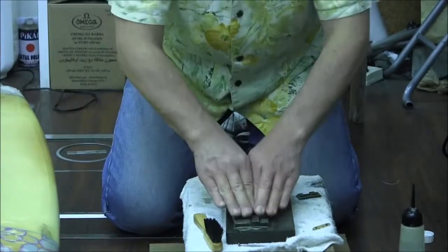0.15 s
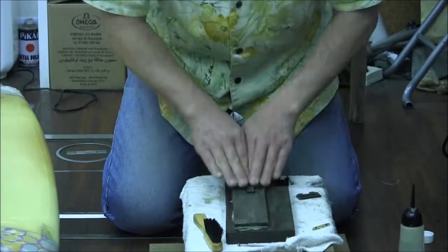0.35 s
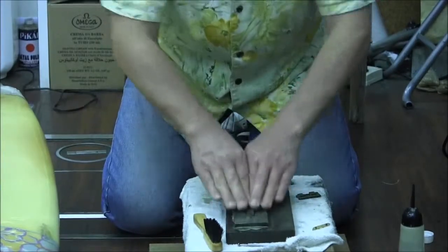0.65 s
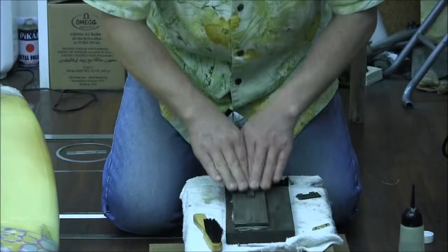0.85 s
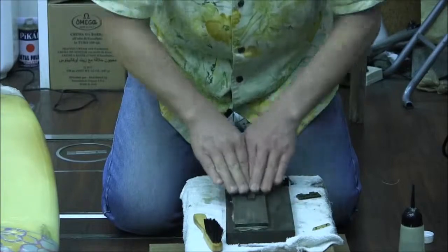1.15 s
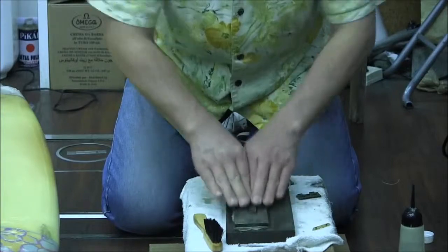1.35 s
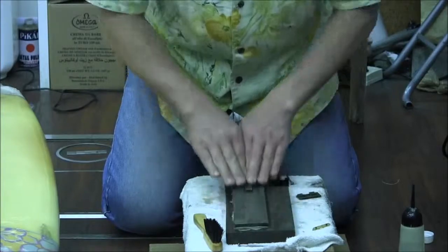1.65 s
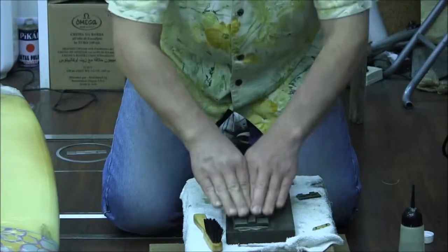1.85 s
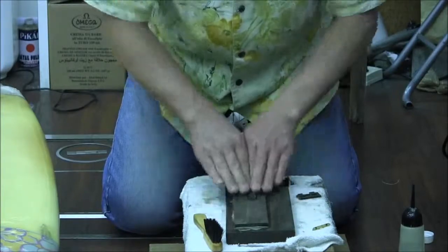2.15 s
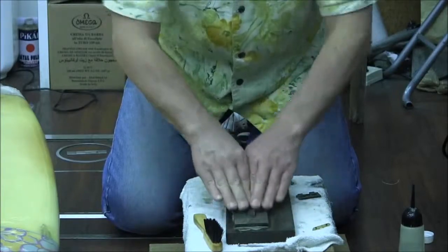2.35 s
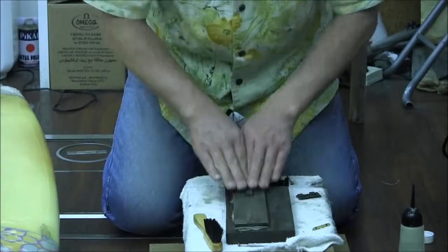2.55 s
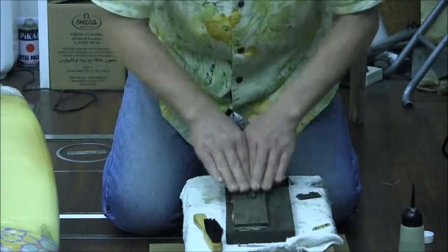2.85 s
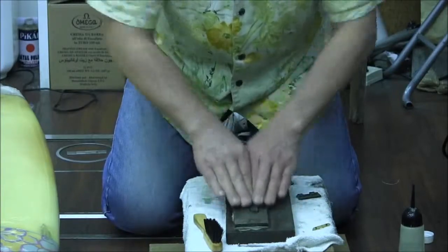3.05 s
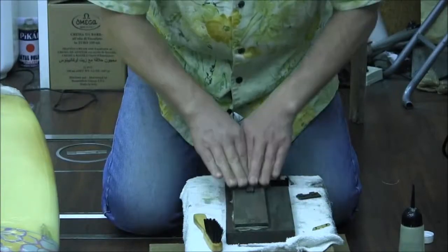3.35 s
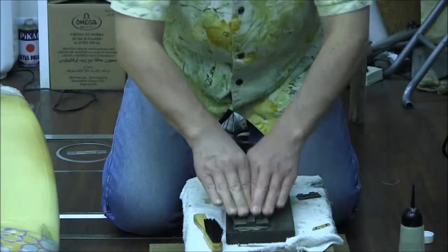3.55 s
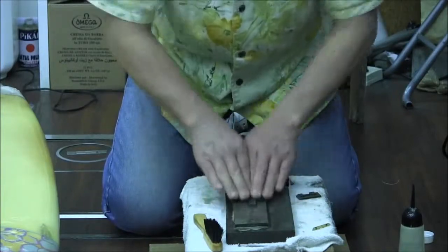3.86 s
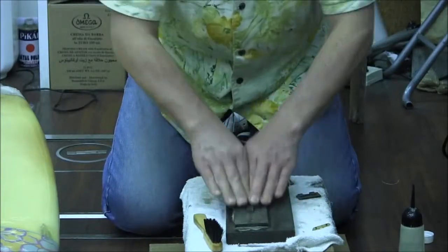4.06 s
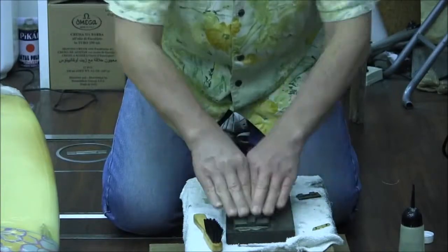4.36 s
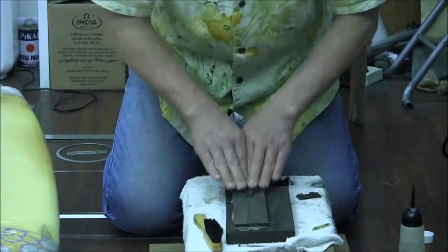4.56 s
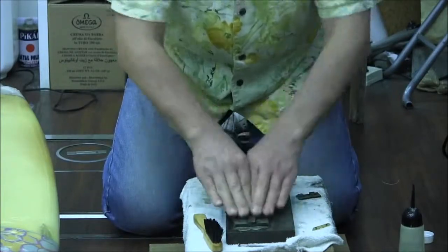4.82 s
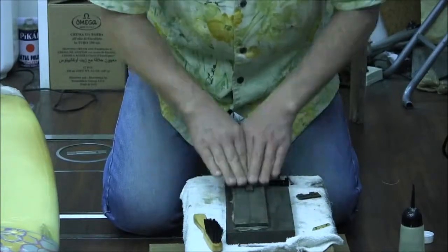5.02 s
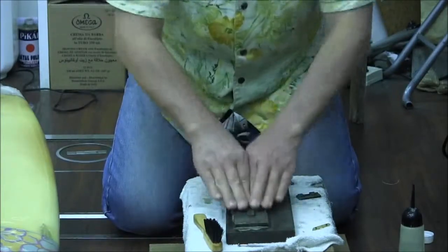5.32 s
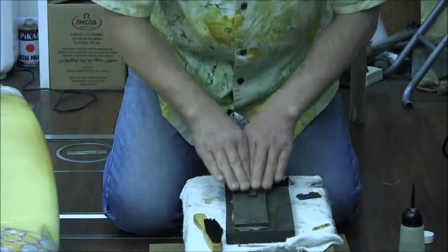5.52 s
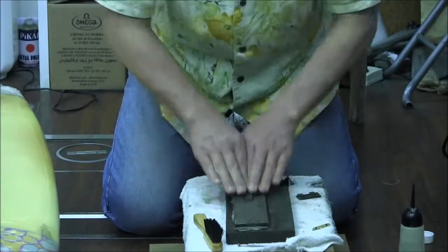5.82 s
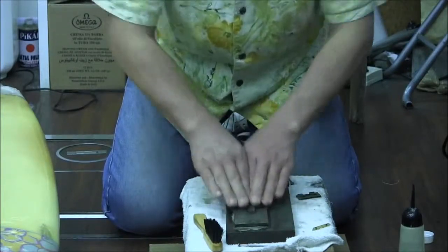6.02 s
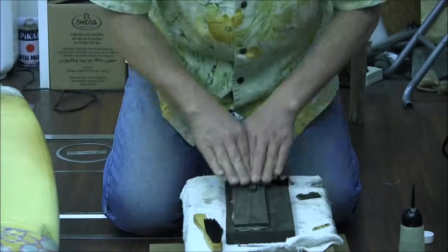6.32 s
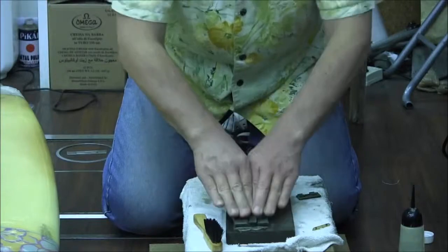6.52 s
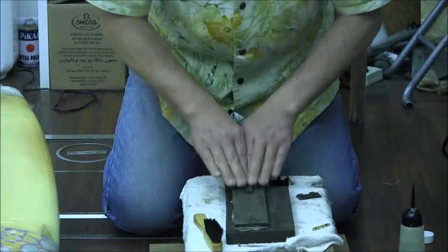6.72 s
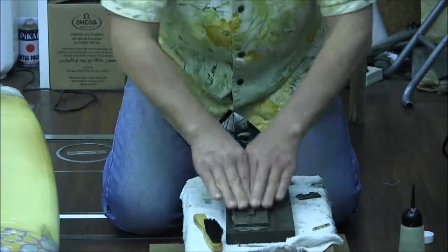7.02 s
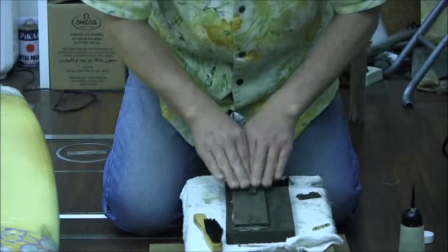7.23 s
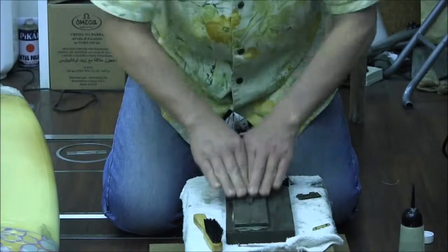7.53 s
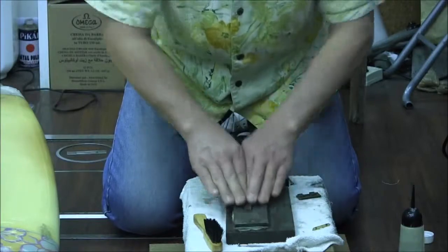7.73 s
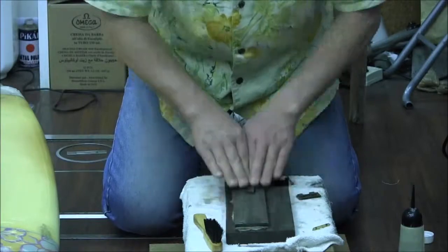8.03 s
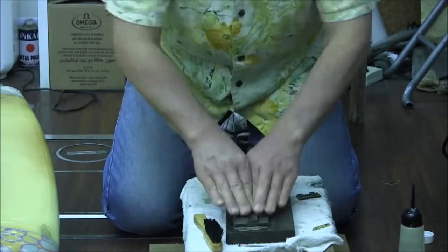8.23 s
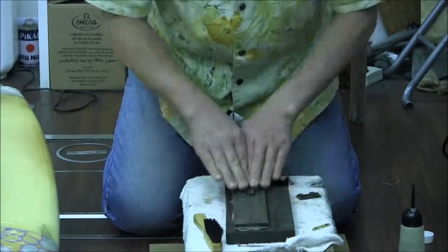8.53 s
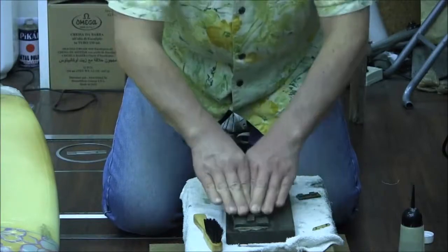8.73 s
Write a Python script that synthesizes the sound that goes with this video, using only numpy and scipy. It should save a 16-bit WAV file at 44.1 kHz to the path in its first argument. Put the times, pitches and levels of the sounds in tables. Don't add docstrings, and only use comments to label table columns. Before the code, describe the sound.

A steel blade is rubbed steadily back and forth on a wet whetstone, a gritty ringing hiss, with wooden knocks behind and a low room hum.

```python
import sys
import numpy as np
from scipy import signal
from scipy.io import wavfile
from scipy.ndimage import uniform_filter1d

SR = 44100
rng = np.random.default_rng(int(sys.argv[2]) if len(sys.argv) > 2 else 0)


def wav_record(signal):
    frames = np.transpose(np.atleast_2d(signal))
    bounded = np.clip(frames, -1, 1)
    quanta = np.round(bounded * 32767).astype(np.int16)
    wavfile.write(sys.argv[1], SR, quanta)


def natural_amplitude(level_db):
    exponent = np.asarray(level_db, float) / 20
    return 10 ** exponent


N = 391608


def evened(x):
    return x / np.sqrt(np.mean(x ** 2) + 1e-20)


def read(points, hz):
    f, value = np.transpose(points)
    return np.interp(np.log(hz + 1), np.log(f + 1), value)


def along(rows, t):
    s, *columns = np.transpose(rows)
    return [np.interp(t, s, column) for column in columns]


def add(mix, start_s, sound):
    part = mix[round(start_s * SR):][:len(sound)]
    part += sound[:len(part)]


def peak(hz, centre_hz, width_hz):
    return 1 / (1 + (2 * (hz - centre_hz) / width_hz) ** 2)


def resonate(x, hz, width_hz):
    turn = np.exp(2j * np.pi * np.cumsum(hz * np.ones(len(x))) / SR)
    r = np.exp(-np.pi * width_hz / SR)
    smooth = signal.lfilter([1 - r], [1, -r], x / turn + 1e-18)
    return 2 * (turn * smooth).real


def clicks(per_s, spread_db):
    size = natural_amplitude(spread_db * np.minimum(rng.exponential(1, N), 4))
    happens = rng.random(N) < per_s / SR
    return evened(size * rng.standard_normal(N) * happens)


def patches(shape, count, size):
    field = rng.standard_normal(shape[::-1]).T
    field = uniform_filter1d(field, size=count, axis=0)
    return evened(uniform_filter1d(field, size=size, axis=1))


def colour(x, points, patchy_db, size=512):
    frame = dict(fs=SR, nperseg=size, noverlap=size * 3 // 4)
    hz, t, z = signal.stft(x, **frame)
    z = z * natural_amplitude(read(points, hz)[:, None] + patchy_db * patches(z.shape, count=6, size=14))
    return signal.istft(z, **frame)[1][:len(x)]


def ports(x, likeness):
    hz, t, z = signal.stft(x, SR, nperseg=1024)
    same = np.clip(read(likeness, hz), 0, 1)[:, None]
    scramble = np.exp(2j * np.pi * rng.random(z.shape[::-1]).T)
    side = z * scramble * np.sqrt((1 - same) / (1 + same))
    return signal.istft(np.array([z + side, z - side]), SR, nperseg=1024)[1][:, :N]


# pitch_hz, level_db
GRIT_COLOUR = [(300, -19), (700, -12), (1010, -12.5), (1480, -11), (2000, -15.5), (2800, -8.5), (3540, -9),
               (4500, -6.5), (5200, -5), (6190, -8), (7200, -9), (9200, -9.5), (10500, -12.5),
               (13500, -20.5)]
# pitch_hz, rise_db (per dB of effort)
BRIGHTER_WITH_EFFORT = [(500, -0.6), (1500, -0.5), (4000, 1), (6000, 0.62), (8000, 1.46), (12000, 2)]
# pitch_hz, width_hz, level_db
BLADE_MODES = [(3830, 400, -7), (4025, 90, -1), (4125, 100, 2.5), (4200, 480, -1), (4290, 90, 1),
               (4480, 500, -7)]
# pitch_hz, width_hz, level_db (over the grit)
STONE_MODES = [(1020, 36, 3.5), (1650, 22, 6.5), (1865, 33, 7), (2050, 41, 7), (2320, 12, 7), (2462, 28, 3),
               (2567, 43, 5.5), (2780, 31, -0.5), (3250, 500, -1.5), (4740, 40, -0.5), (7970, 830, 4),
               (8060, 350, 2.5)]
# time_s, extra_db
FREE_MOMENTS = [(1.55, 0), (2.81, 2), (3.24, 5), (4.08, 3), (4.29, 3.5), (4.62, 1), (5.1, 5), (5.23, 3),
                (6.56, 3.5), (6.85, 3), (7.06, 3), (7.8, 3)]
# time_s, length_s, level_db, pitch_hz, glide_hz_per_s
BITES = [(0.457, 0.045, -35.5, 2590, 10), (0.545, 0.062, -35, 3270, 1500), (1.12, .05, -34.5, 3170, 10),
         (2.825, .07, -37, 3300, 13), (3.424, .08, -40, 2560, 2000), (5.242, 0.065, -40, 3030, 10),
         (5.8, 0.095, -38.5, 3100, 10), (6.035, 0.11, -38.5, 2450, -5500), (6.206, 0.13, -39, 3250, 10),
         (6.44, 0.073, -38.5, 2520, -6000), (6.873, 0.04, -35, 3050, 10), (7.75, 0.065, -46, 2290, -3000),
         (8.265, 0.063, -37, 3280, 10), (8.382, 0.072, -35.5, 3200, 8), (8.362, .06, -35, 3950, 10),
         (8.637, .06, -40, 2870, -1500), (8.816, 0.081, -32, 3340, 900)]
# time_s, length_s, level_db, pitch_hz
TURN_SINGS = [(1.05, 0.16, -33, 1010), (1.82, .07, -36, 2030), (4.333, .08, -25, 2050),
              (4.76, .08, -24.5, 2060), (5.178, .07, -26, 2080), (6.083, 0.06, -21, 2060),
              (6.48, .08, -25, 2060), (6.917, .07, -28, 2000), (7.342, 0.076, -25, 2060),
              (7.6, .05, -29, 2310), (7.777, .08, -27, 2030), (7.758, .05, -29, 1800),
              (8.14, .06, -24, 2320), (8.19, .05, -25, 2100), (8.22, .06, -29, 2500)]


def scrape():
    frame = dict(fs=SR, nperseg=1024, noverlap=768)
    hz, t, grit = signal.stft(clicks(per_s=30000, spread_db=-0.07), **frame)
    hz = hz[:, None]
    hand_db, ring_db, hollow_db, hollow_hz = strokes(t)

    effort_db = 10 * np.log10(natural_amplitude(2 * hand_db) + natural_amplitude(2 * -46.)) + 41.06
    hiss = natural_amplitude(2 * (read(GRIT_COLOUR, hz) - 31. + read(BRIGHTER_WITH_EFFORT, hz) * effort_db))
    stone = 1 + sum(natural_amplitude(2 * db) * peak(hz, f, width) for f, width, db in STONE_MODES)

    ring_db = ring_db + sum(db * np.exp(-((t - s) / 0.032) ** 2) for s, db in FREE_MOMENTS)
    blade = sum(natural_amplitude(2 * db) * peak(hz, f, width) ** 2 for f, width, db in BLADE_MODES)
    ring = natural_amplitude(2 * (ring_db + 7.0)) * blade
    for s, length, db, f in TURN_SINGS:
        swell = np.exp(-(2 * (t - s) / length) ** 2)
        ring += natural_amplitude(2 * db) * swell * peak(hz, f, 100.0) ** 2

    hollow = natural_amplitude(2 * (hollow_db + 5.0)) * peak(hz, hollow_hz, 1720.0) ** 2
    hollow *= natural_amplitude(2 * 0.19 * patches(grit.shape, count=7, size=6))
    for s, length, db, f, glide in BITES:
        swell = np.exp(-(1.73 * (t - s) / length) ** 2)
        hollow += natural_amplitude(2 * (db + 6.5)) * swell * peak(hz, f + glide * (t - s), 750.0) ** 2

    fine_db = 3.03 * patches(grit.shape, count=1, size=20) + 0.58 * patches(grit.shape, count=12, size=8)
    power = (hiss + hollow) * stone * natural_amplitude(2 * fine_db)
    power = power + ring * natural_amplitude(2 * 0.42 * fine_db)
    out = signal.istft(grit * np.sqrt(power), **frame)[1][:N]
    out += squeaks()
    uneven_pressure = evened(uniform_filter1d(rng.standard_normal(N), size=900))
    return out * natural_amplitude(0.19 * uneven_pressure)


# start_s, effort_db, ring_db, hollow_db, hollow_pitch_hz
PUSH_STROKES = [(0.085, -40, -37.5, -37.5, 2750), (0.505, -40, -36, -37.5, 2530),
                (0.93, -40.5, -37.5, -37.5, 2440), (1.363, -39, -36, -38, 2700),
                (1.793, -39.5, -36.5, -36, 2750), (2.224, -39.5, -36.5, -39.5, 2510),
                (2.645, -40, -37.5, -37, 2750), (3.058, -41.5, -38.5, -39.5, 2680),
                (3.476, -39.5, -37.5, -39, 2520), (3.899, -39.5, -37.5, -38.5, 2650),
                (4.323, -40.4, -37, -40.5, 2530), (4.757, -39.5, -38.5, -40.5, 2670),
                (5.176, -39.5, -36.5, -40.5, 2777), (5.611, -40, -36, -37, 3260),
                (6.03, -39.5, -34.5, -39, 2910), (6.456, -39.5, -37, -39, 2714),
                (6.89, -40, -36.5, -40.5, 2650), (7.315, -39.5, -36.5, -40, 2800),
                (7.757, -39, -36.5, -39, 2706), (8.191, -39.5, -36.5, -38.5, 3000),
                (8.627, -39.5, -38, -38, 3100)]
# start_s, effort_db, ring_db, hollow_db, hollow_pitch_hz
PULL_STROKES = [(-0.13, -40, -40.5, -36.5, 2770), (0.315, -40.5, -37, -40, 2600),
                (0.73, -39.5, -38, -37, 2710), (1.15, -40.1, -38, -36.5, 2570),
                (1.582, -40, -38, -39.5, 2450), (2.012, -39.5, -38.5, -38, 2830),
                (2.445, -40, -38.5, -37, 2700), (2.87, -39.5, -38, -40, 2520), (3.271, -40, -38, -38, 2540),
                (3.691, -40.5, -37.5, -39.5, 2704), (4.118, -40.0, -37.5, -38.5, 2700),
                (4.548, -38.5, -37.5, -40, 2640), (4.981, -40, -37.5, -39.5, 2660),
                (5.403, -40, -36.5, -39.5, 2780), (5.837, -40.5, -38, -39, 2800),
                (6.248, -40.0, -38.5, -41.5, 2750), (6.685, -40, -38, -41, 2714),
                (7.123, -40.5, -37.5, -39.5, 2770), (7.545, -39, -37.5, -40.5, 2714),
                (7.977, -40, -37.5, -39.5, 2770), (8.422, -39.5, -38, -37, 3100),
                (8.846, -39.5, -40.2, -37, 2800)]
# share_of_stroke (0-1), effort_db, ring_db, hollow_db, hollow_pitch_factor (times)
PUSH_SHAPE = [(0, -5.5, -2, -5, 0.99), (.13, -1, 1.5, -2, 0.88), (.35, -0.3, 0.8, -3.5, 0.96),
              (.55, 0.9, -0.6, -5.5, 1.24), (.77, 1.5, 2.5, -0.5, 1.11), (.89, -1.5, 3.5, -4, 0.85),
              (1, -3.5, -2, -3, 0.97)]
# share_of_stroke (0-1), effort_db, ring_db, hollow_db, hollow_pitch_factor (times)
PULL_SHAPE = [(0, -4, 2.5, -6, 0.71), (.18, -1.2, 0.5, -1.5, 0.97), (.38, -0.7, -1, -4, 0.96),
              (.52, -1, -0.5, -7, 1), (.72, 0, 2, -2.7, 1), (.88, -1.2, 2.5, -2, 1),
              (1, -5, -3, -0.5, 0.97)]


def strokes(t):
    last_turn_s, blend_s = 9.06, 0.03
    rows = [(row, PUSH_SHAPE) for row in PUSH_STROKES] + [(row, PULL_SHAPE) for row in PULL_STROKES]
    rows.sort(key=lambda pair: pair[0][0])
    ends = [row[0] for row, shape in rows[1:]] + [last_turn_s]
    own, shared = np.zeros((2, 4, len(t)))
    for ((start, *values), shape), end in zip(rows, ends):
        now = (t >= start) & (t < end)
        own[:, now] = np.array(values)[:, None]
        shared[:, now] = along(shape, (t[now] - start) / (end - start))
    own = uniform_filter1d(own, size=max(round(blend_s / (t[1] - t[0])), 1), axis=1)
    return *(own[:3] + shared[:3]), own[3] * shared[3]


# time_s, peak_db, pitch_hz, length_s
SQUEAKS = [
    (0.063, -21, 2720, 0.028),
    (1.34, -23, 3250, 0.023),
    (1.461, -16, 1930, 0.012),
    (4.738, -22, 3240, 0.011),
    (2.207, -22, 2130, 0.005),
    (3.23, -17, 4320, 0.0033),
    (3.522, -24, 4300, 0.0063),
    (8.444, -19, 4860, 0.012),
]


def squeaks():
    out = np.zeros(N)
    for s, db, f, length in SQUEAKS:
        u = np.arange(-2, 2, 1 / (length * SR + 8))
        rub = evened(resonate(rng.standard_normal(6000), f, 160.0))[-len(u):]
        add(out, s - 2 * length, natural_amplitude(db - 17.5) * rub * np.exp(-2 * u[:len(rub)] ** 2))
    return out


# time_s, peak_db, pitch_hz, crack_db (over the thud), box_ring_db
KNOCKS = [(0.4239, -24.5, 1560, -14, -30), (1.269, -45, 1020, -5, -14), (1.338, -36, 816, -12, -19),
          (1.45, -38, 1520, -10, -12), (2.073, -42, 1150, -4, -10), (2.204, -32, 581, 1, -16),
          (2.402, -24.5, 1560, 4, -19), (2.407, -31.5, 1700, 16, -8), (2.408, -40, 1150, 1, -6),
          (2.444, -34, 1700, 3, -20), (2.5235, -21, 1240, -14, -18), (2.528, -27.5, 1400, -10, -22),
          (2.6492, -21, 1600, -22, -11), (2.654, -25, 1500, -16, -8), (2.938, -35, 1145, 2, -23),
          (3.2912, -26, 1790, -25, -22), (3.296, -33, 1400, -14, -18), (3.456, -32, 704, -8, -24),
          (3.731, -39, 988, -2.5, -14), (3.929, -37, 1610, -1.5, -16), (3.947, -32, 1530, -5, -30),
          (4.055, -32, 684, -5, -27), (4.733, -39, 860, -13, -26), (4.914, -42, 912, -6, -22)]
# pitch_hz, level_db, fade_s (to -60 dB)
BOX_MODES = [(432, -14, 0.07), (679, -3, 0.11), (1150, -5, 0.21), (1290, -10, 0.23), (1730, -18, 0.089),
             (1630, -22, 0.24), (1930, -12, 0.22), (1450, -10, .15), (870, -20, 0.053), (2710, -8, .08)]


def knocks():
    t, out = np.arange(8000) / SR, np.zeros(N)
    for s, db, hz, crack_db, ring_db in KNOCKS:
        fade_s = 0.037 + 0.13 * max(db + 21, 0)
        noise, chance = rng.standard_normal(len(t)), rng.random((len(BOX_MODES), 2))
        crack = resonate(noise, 5600.0, 3800.0) * natural_amplitude(crack_db - 0.5 - 60 * t / max(0.29 * fade_s, .004))
        push = natural_amplitude(4.) * np.sin(2 * np.pi * 1700 * t) * np.exp(-t / .00022)
        thud = evened(resonate(noise, hz, 1150.0)) * natural_amplitude(-12.5 - 60 * t / max(1.1 * fade_s, .005))
        narrow = evened(resonate(resonate(noise, hz, 900.), hz, 900.))
        thud += narrow * natural_amplitude(-18 - 60 * t / (1.5 * fade_s))
        box = np.zeros(len(t))
        for (f, mode_db, mode_fade_s), (p, q) in zip(BOX_MODES, chance):
            level = natural_amplitude(mode_db + ring_db - 2.9 * p - 60 * t / mode_fade_s) * peak(f, hz, 1150.0)
            box += level * np.sin(2 * np.pi * f * (0.85 + 0.021 * q) * t)
        add(out, s + 0.00128, natural_amplitude(db) * (crack + push + thud + box))
    return out


# time_s, pitch_hz, peak_db, fade_s (to -60 dB)
KNOCK_RINGS = [(2.407, 1166, -33, 0.13), (2.403, 1656, -34, .12), (2.443, 1650, -38, .1),
               (2.444, 1150, -39, .1), (2.523, 1200, -37, .07), (2.523, 1490, -32, .06),
               (2.524, 862, -30.5, 0.067), (2.53, 1344, -40, 0.2), (2.526, 1625, -43, .2),
               (2.53, 418, -43, 0.12), (2.526, 702, -44, .2), (2.526, 582, -41, 0.2),
               (2.651, 1467, -31, 0.056), (2.66, 1325, -36, 0.22), (2.653, 1185, -36, 0.13),
               (2.653, 1690, -46, 0.14), (2.653, 1970, -41, 0.45), (2.653, 2036, -41, 0.56),
               (2.69, 1100, -43.5, 0.45), (3.292, 1460, -38, .07), (3.292, 2400, -41, .06),
               (3.457, 565, -42, .07)]


def knock_rings():
    t, out = np.arange(8000) / SR, np.zeros(N)
    for s, hz, db, fade_s in KNOCK_RINGS:
        edges = np.minimum(t / .002, 1) * np.minimum(40 * (t[-1] - t), 1)
        add(out, s, natural_amplitude(db - 60 * t / fade_s) * edges * np.sin(2 * np.pi * hz * t))
    return out


# time_s, peak_db, pitch_hz, length_ms
TICKS = [(0.4254, -33, 3900, .4), (0.4258, -22.5, 1700, 0.34), (1.3465, -26, 2300, .4),
         (2.073, -26, 4000, .3), (2.0814, -27, 2400, .4), (2.1317, -28, 10000, .15),
         (2.1547, -33, 1100, 0.5), (2.1546, -28, 7800, .2), (2.1805, -30, 10000, .15),
         (2.189, -26, 4500, .2), (2.1934, -22, 4500, .2), (2.1937, -25, 10500, .15),
         (2.2048, -19, 5500, .15), (2.2095, -20, 10000, 0.11), (2.2098, -26, 4000, 0.18),
         (2.402, -20, 6000, 0.26), (2.4034, -30, 2000, 0.35), (2.4052, -23, 4500, .3),
         (2.4078, -17, 5500, 0.12), (2.4074, -20.5, 10500, 0.18), (2.4095, -25, 5500, .2),
         (2.4095, -25, 9500, .15), (2.4104, -28, 1500, 0.56), (2.4415, -26, 2500, .3),
         (2.446, -25, 2000, 0.28), (2.4454, -29, 11000, .15), (2.5254, -24, 1700, .35),
         (2.5295, -24, 1800, .35), (2.6528, -24, 1900, 0.36), (2.6562, -25, 1500, 0.64),
         (2.6556, -29, 3800, .3), (2.9404, -37, 1500, .4), (3.293, -21.5, 1790, .3),
         (3.2971, -23, 1500, .4), (3.2987, -32, 2400, 0.36), (3.3032, -29, 4400, .6),
         (3.317, -32, 1800, .3), (3.392, -30, 1500, .3), (3.406, -28, 2300, .3), (3.4305, -29, 2000, 0.43),
         (3.458, -28, 1500, .3), (3.9305, -37, 800, 0.42), (3.9497, -28, 1610, 0.48),
         (4.733, -29, 1500, 0.27)]


def ticks():
    t, out = np.arange(-200, 400) / SR, np.zeros(N)
    for s, db, hz, length_ms in TICKS:
        bell = np.exp(-(1000 * t / (length_ms * np.where(t < 0, 1, 1.6))) ** 2)
        add(out, s + t[0], natural_amplitude(db) * bell * np.cos(2 * np.pi * hz * t))
    return out


# start_s, rise_s, hold_s, fall_s, level_db
SHUFFLES = [
    (.44, 0.033, .22, .06, -60),
    (0.657, 0.061, .01, 0.19, -54.5),
    (1.22, .02, 0.022, 0.059, -54.5),
    (1.329, 0.01, .004, 0.015, -48),
    (1.367, 0.076, 0.032, 0.11, -47.5),
    (1.95, 0.048, 0.17, .04, -53.5),
    (2.072, 0.092, 0.062, 0.068, -50.5),
    (2.407, 0.0024, 0.0031, 0.012, -41.5),
    (2.424, 0.013, .09, 0.01, -58),
    (3.285, 0.0037, 0.13, 0.037, -49),
]
# pitch_hz, level_db
WOOD_COLOUR = [(88, -48), (150, -14.5), (596, -2.5), (860, -0.5), (981, -5), (1140, 0.5), (1240, -1.5),
               (2580, -2.5), (5000, -13), (6500, -26), (11000, -120)]


def shuffles():
    rub = evened(colour(clicks(per_s=5000, spread_db=1.6), WOOD_COLOUR, patchy_db=1.2))
    ramp_db, sag_db_per_s = 21, 5
    level = np.zeros(N)
    for start, rise, hold, fall, db in SHUFFLES:
        t = np.arange(0, rise + hold + 2 * fall, 1 / SR)
        short = np.maximum(1 - t / rise, 0) + np.maximum((t - rise - hold) / fall, 0)
        add(level, start, natural_amplitude(db + 6.5 - ramp_db * short - sag_db_per_s * t))
    return level * rub + slips(rub)


# time_s, fade_s (to -60 dB), level_db, pitch_hz
SLIPS = [(2.4, .05, -46, 1600), (2.122, 0.11, -48, 2500), (2.145, 0.06, -37.5, 610), (2.7, .06, -46, 450),
         (2.437, 0.045, -30.5, 1260), (2.1, 0.045, -36, 1100), (2.528, .05, -37, 2300),
         (2.2, 0.044, -29, 2700), (2.1, .05, -44, 2900), (1.338, 0.047, -41, 690), (1.4, 0.046, -41, 1700),
         (1.2, .03, -39, 2100), (1.6, 0.082, -44, 2800), (2.13, 0.11, -47, 400), (1.9, 0.12, -54, 250),
         (3.295, .15, -48, 260), (2.204, 0.05, -49, 660), (3.314, 0.054, -45, 1300),
         (3.7, 0.043, -46, 1200), (3.341, .06, -43, 1400), (3.374, .06, -41, 1170), (3.1, .06, -43, 1300),
         (3.403, .04, -44, 2000), (2.9, 0.053, -40.5, 1600), (4.3, 0.042, -38.5, 2350),
         (2.8, .04, -38, 1900), (2.1, 0.036, -41, 460)]


def slips(rub):
    out = np.zeros(N)
    for s, fade_s, db, hz in SLIPS:
        t = np.arange(0, fade_s, 1 / SR)
        slip = evened(resonate(rub[round(s * SR):][:len(t)], hz, 650.))
        add(out, s, slip * natural_amplitude(db + 3.5 - 60 * t / fade_s) * np.minimum(t / 0.0041, 1))
    return out


def room(x, fade_s, dull_hz):
    taps = np.zeros((2, 16000))
    at = np.arange(300, 15980, 20) + rng.integers(0, 20, (2, 784))
    np.put_along_axis(taps, at, rng.choice([-1., 1.], at.shape), 1)
    taps[1] = 0.71 * taps[0] + 0.61 * taps[1]
    taps *= natural_amplitude(-60 * np.arange(16000) / SR / fade_s)
    tail = signal.lfilter(*signal.butter(1, dull_hz, fs=SR), taps)
    return signal.fftconvolve(x[None], tail / np.linalg.norm(tail[0]), axes=1)[:, :N]


# pitch_hz, level_db
HUM_COLOUR = [(15, -50), (35, -38), (119, -6), (381, -1), (476, -4.5), (519, -1.5), (694, -20), (796, -8),
              (882, -34), (994, 0), (1500, -10.5), (1950, -26), (3300, -120)]
# pitch_hz, likeness (0-1)
HUM_LIKENESS = [(30, .85), (100, 0.36), (200, 0.059), (400, 0.054), (700, 0.13), (1500, 1)]


def hum():
    noise = evened(colour(rng.standard_normal(N), HUM_COLOUR, patchy_db=3.5, size=4096))
    drone = evened(resonate(rng.standard_normal(N), 119.5, 5.8))
    return natural_amplitude(-56 - 1.5) * ports(noise + natural_amplitude(-18.5) * drone, HUM_LIKENESS)


# pitch_hz, likeness (0-1)
GRIT_LIKENESS = [(500, 0.069), (1000, 0.91), (2500, 0.55), (4500, 0.59), (12000, 0.42)]


def scene():
    near = ports(scrape(), GRIT_LIKENESS)
    clatter = shuffles() + knocks() + knock_rings() + ticks()
    clatter = signal.sosfilt(signal.butter(3, 250., "high", fs=SR, output="sos"), clatter)
    direct = clatter * natural_amplitude([[.4], [-.4]])
    return near + direct + natural_amplitude(-9.5) * room(clatter, fade_s=0.37, dull_hz=3570) + hum()


# time_s, top_hz
TOP_EDGE = [(0.0, 12720), (.45, 12780), (.7, 12620), (1.8, 12620), (2.5, 12960), (2.58, 12300),
            (3.0, 12500), (3.5, 13100), (4.25, 13260), (4.5, 13050), (5.3, 13120), (5.95, 12900),
            (6.1, 12560), (7.05, 12480), (7.25, 12200), (7.65, 12870), (8.88, 13050)]
# pitch_hz, share (0-1)
SIDE_KEPT = [(30, .05), (70, 0.082), (200, 0.93), (450, .55), (700, .3), (1150, .16), (1400, 0),
             (2200, 0.033), (2400, .18), (3900, .22), (4050, 0)]
# time_s, length_s
WIDE_MOMENTS = [
    (0.395, 0.13),
    (1.12, 0.11),
    (1.588, 0.11),
    (2.481, .1),
    (4.23, .11),
    (4.357, 0.11),
    (5.936, 0.11),
    (6.24, 0.1),
]


def camera_bands(x):
    frame = dict(fs=SR, window=signal.windows.cosine(4096), nperseg=4096, noverlap=2048)
    mid, side = (x[0] + x[1]) / 2, (x[0] - x[1]) / 2
    hz, t, z = signal.stft(np.array([mid, side, side]), **frame)
    luck = np.repeat(rng.random((len(t), 171)), 12, axis=1)[:, :len(hz)].T
    narrow_luck = np.repeat(rng.random((len(t), 410)), 5, axis=1)[:, :len(hz)].T
    hz = hz[:, None]
    top_hz = along(TOP_EDGE, t)[0]
    room_left = (top_hz + 180.0 - hz) / 190.0
    z *= 1 - np.exp(-1.6 * room_left) > luck

    spare = np.clip(.8 + (top_hz - 12800) / 1300, .4, 3)
    loud = uniform_filter1d(abs(z[1]), size=12, axis=0)
    loud = loud > 3.2 * np.median(loud, axis=1, keepdims=True)
    z[1] *= luck < read(SIDE_KEPT, hz) * spare + .45 * (loud & (hz < 2200))
    z[0] *= np.where((hz < 95) & (luck > .65), natural_amplitude(-22.), 1)
    thinned = (hz > 100) & (hz < 1850) & (narrow_luck > .885 + .065 * spare)
    z[0] *= np.where(thinned, natural_amplitude(-18.), 1)

    mid, thin, whole = signal.istft(z, **frame)[1][:, :N]
    wide = np.zeros(N)
    for s, length in WIDE_MOMENTS:
        add(wide, s - length / 2, signal.windows.hann(round(length * SR)))
    side = thin + wide * (natural_amplitude(0.5) * whole - thin)
    return np.array([mid + side, mid - side])


def low_pass(x):
    return signal.sosfilt(signal.butter(12, 13970, fs=SR, output="sos"), x)


def record(dry):
    dry = signal.sosfilt(signal.butter(2, 45., "high", fs=SR, output="sos"), dry)
    mix = camera_bands(dry)
    return low_pass(mix)


dry = scene()
out = record(dry)
wav_record(out)
```